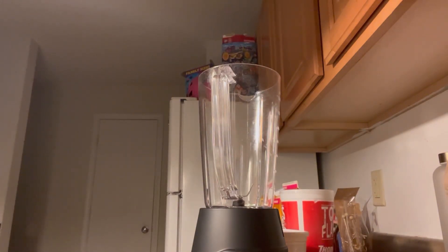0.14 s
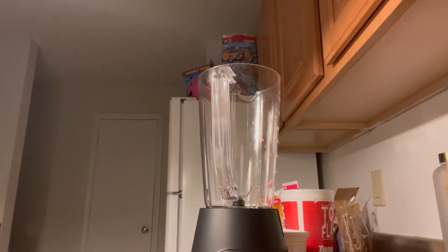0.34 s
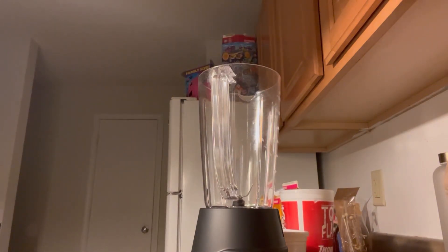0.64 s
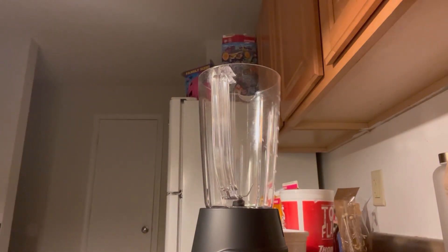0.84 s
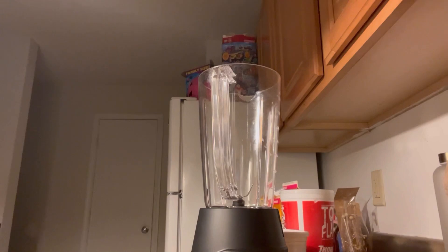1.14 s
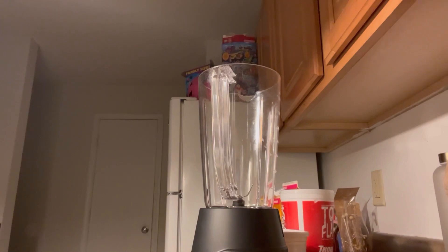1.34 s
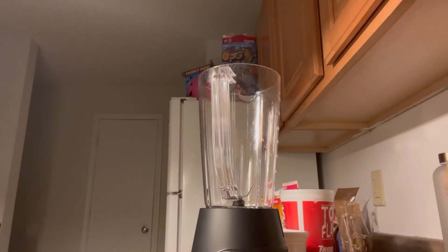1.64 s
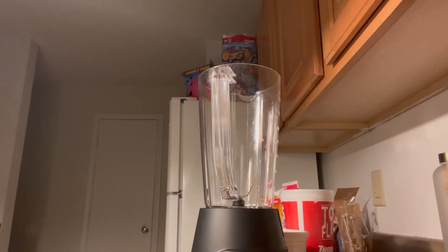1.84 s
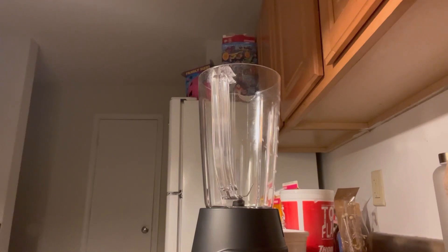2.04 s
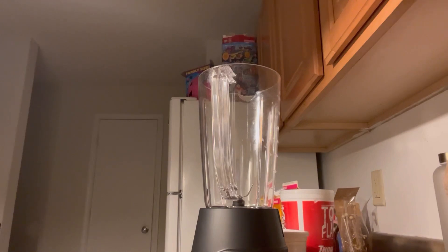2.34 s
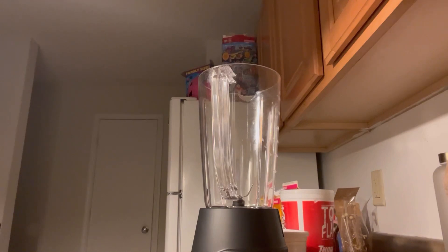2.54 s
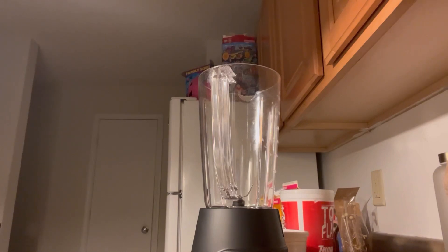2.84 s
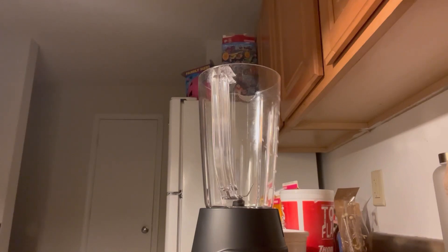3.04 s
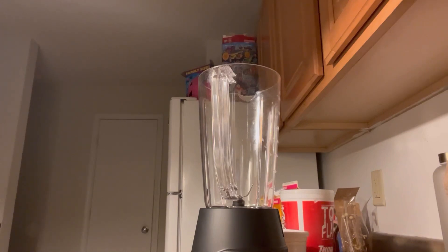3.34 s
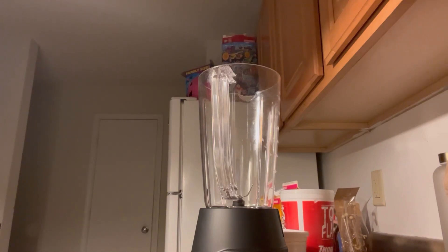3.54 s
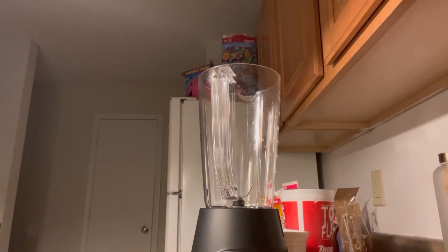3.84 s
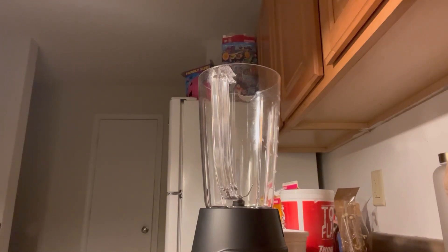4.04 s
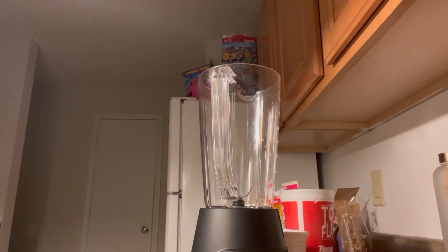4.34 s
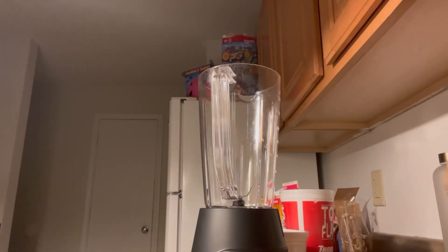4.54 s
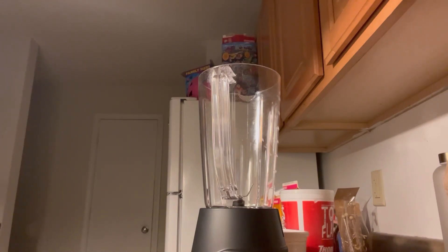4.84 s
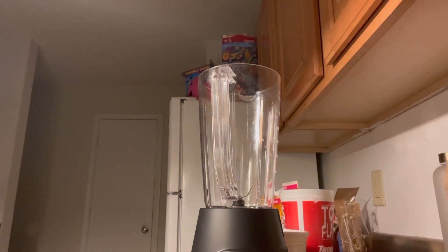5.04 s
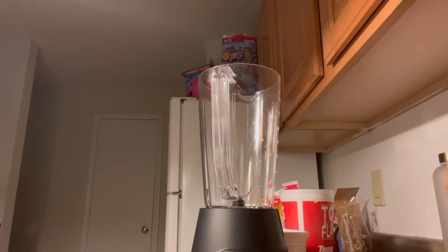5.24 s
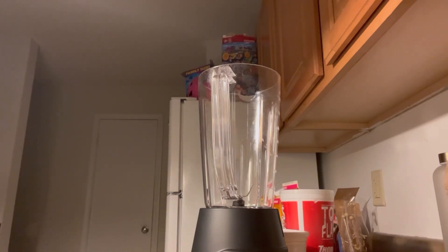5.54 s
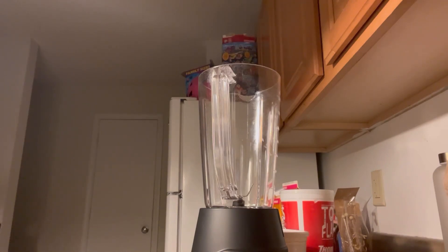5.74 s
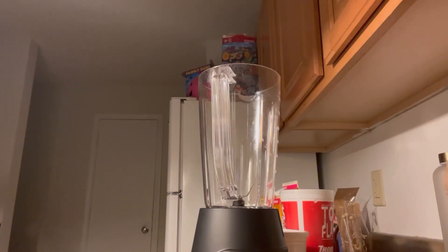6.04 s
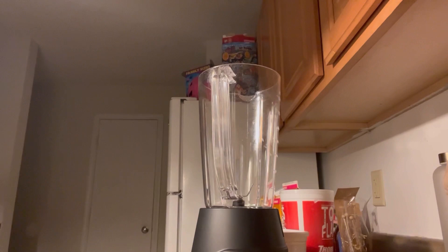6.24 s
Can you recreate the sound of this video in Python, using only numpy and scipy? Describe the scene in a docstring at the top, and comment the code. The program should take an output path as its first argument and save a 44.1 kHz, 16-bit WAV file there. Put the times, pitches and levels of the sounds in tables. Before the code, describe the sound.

In a small home kitchen, a few steps from a phone, utensils scrape, chink and clack together in a wooden drawer while dull bumps ring its panels and the wood gives a brief groan. The rummaging pauses, leaving dry wrapper ticks and one sharp crackle, then clatter resumes and the drawer bangs shut loudly with a few rattling bounces, fading into a low house hum.

```python
"""Utensils slide, chink and clatter as a hand rummages in a wooden kitchen drawer, a few steps from the phone.
They bump the drawer's walls, a wrapper ticks in a pause, and the drawer bangs shut and bounces.
Contacts are bursts of uneven force through resonances of wood, metal or wrapper; sliding is steady grit.
A short groan is a gliding tone. Room tails of decaying noise follow the contacts and the sliding.
The house hums low underneath, shaped from noise, with a faint hiss at each of the two ports."""
import sys
import numpy as np
from scipy import signal
from scipy.fft import rfft, irfft, next_fast_len
from scipy.io import wavfile
from scipy.ndimage import uniform_filter1d, map_coordinates

SR = 44100
rng = np.random.default_rng(int(sys.argv[2]) if len(sys.argv) > 2 else 0)


def master(y):
    """Save y as 16-bit WAV."""
    cut = np.clip(np.atleast_2d(y).T, -1, 1)
    pcm = np.round(cut * 32767)  # scale
    wavfile.write(sys.argv[1], SR, pcm.astype(np.int16))


N = 281530

# drawer panel resonances: [f/Hz, width/Hz, level/dB]
PANEL_MODES = [(167.8, 6.3, -14.5), (211, 34.4, -1), (278, 27, 0), (317, 22, -1), (359.7, 22, -6.5),
               (420, 41, -6.5), (476, 150, -8), (665, 88, -12.5), (754, 84, -14)]
# utensils lying damped on each other: [f/Hz, width/Hz, level/dB]
UTENSIL_MODES = [(780, 410, 9), (1290, 150, 0), (1630, 150, -3.5), (2380, 220, -23.5), (2730, 200, -8),
                 (3820, 4100, -4)]
# broad colour of utensil bodies: [f/Hz, level/dB]
DULL_COLOUR = [(60, -26), (300, 11), (600, 3.5), (1000, 2.5), (2000, 2), (3000, -4.5), (4500, -11),
               (8000, -56)]
# broad colour of bright edges: [f/Hz, level/dB]
BRIGHT_COLOUR = [(1500, -11.5), (3000, 9.5), (4500, 6), (6500, 7.5), (8000, -5), (10000, -3), (12000, -30),
                 (14200, -19.5), (14700, -59)]
# broad colour of the topmost sizzle: [f/Hz, level/dB]
SIZZLE_COLOUR = [(5000, -26.5), (8000, -6), (10800, -4), (12200, -15.5), (13700, -5.5), (14300, -25.5),
                 (14600, -59), (15500, -53.5)]


def amp(db):
    """Gain of a level in dB."""
    return 10 ** (np.asarray(db) / 20)


def unit(x):
    """x at rms 1."""
    return x / np.sqrt(np.mean(x ** 2) + 1e-20)


def along(points, hz):
    """Reads (f/Hz, value) points on a log frequency axis."""
    f, v = np.transpose(points)
    return np.interp(np.log(hz + 1), np.log(f + 1), v)


def coloured(points, f):
    """Gain at f from (f/Hz, level/dB) points."""
    return amp(along(points, f))


def curves(rows):
    """One value per sample for each column after the time."""
    s, *cols = np.transpose(rows)
    return [np.interp(np.arange(N) / SR, s, c) for c in cols]


def filtered(x, response):
    """x times a complex response of frequency."""
    m = next_fast_len(x.shape[-1] + 8192)
    spectrum = rfft(x, m) * response(np.fft.rfftfreq(m, 1 / SR))
    return irfft(spectrum, m)[..., :x.shape[-1]]


def wobble(rate):
    """A smooth random curve, rate knots a second."""
    knots = rng.standard_normal(int(N * rate / SR) + 4)
    return map_coordinates(knots, [np.arange(N) * rate / SR])


def ring(f, hz, width_hz):
    """One causal resonance, gain 1 at its top."""
    return 1j * f * width_hz / (hz * hz - f * f + 1j * f * width_hz)


def body(modes, scatter_db=0):
    """Resonances of alternating sign, their strengths scattered at random by scatter_db."""
    gains = amp(scatter_db * rng.standard_normal(len(modes)))

    def response(f):
        return sum((-1) ** k * gains[k] * amp(db) * ring(f, hz, width)
                   for k, (hz, width, db) in enumerate(modes))
    return response


def grit(size, spread_db):
    """Dense small contacts of very uneven strength."""
    return rng.standard_normal(size) * amp(spread_db * rng.standard_normal(size))


def blow(length, response, spread_db, rise, firm):
    """A firm first touch, then chatter for about `length` s; its loudest moment has rms 1."""
    t = np.arange(SR // 4) / SR
    rise = max(rise, 3e-4)
    envelope = (1 - np.exp(-t / rise)) * np.exp(-t / max(0.43 * length, 1e-3))
    force = grit(len(t), spread_db) * envelope
    force[round(rise * SR)] = firm * np.linalg.norm(force)
    sound = filtered(force, response)
    return sound / np.sqrt(uniform_filter1d(sound ** 2, size=400).max())  # 9 ms rms


def add(track, s, sound):
    """Mixes a sound in at s seconds."""
    start = round(s * SR)
    track[..., start:][..., :sound.shape[-1]] += sound[..., :N - start]


def hum():
    """The house's low wavering hum: shaped noise, near alike at both ports, with brief swells."""
    # colour of the hum: [f/Hz, level/dB]
    hum_colour = [(12, -41.5), (20, -31.5), (32, -26), (47, -4), (70, 4), (145, -17.5), (288, -35.5),
                  (420, -62), (480, -31.5), (500, -52), (650, -81), (1100, -120)]
    # slow course of the hum: [t/s, level/dB]
    hum_course = [(0, -49), (2.8, -48.5), (3.3, -54), (4.1, -52), (6.38, -48.5)]
    # brief swells on top of that course: [t/s, level/dB]
    swells = [(0.02, -45), (0.42, -51), (0.7, -57), (0.91, -50), (1.43, -44), (1.9, -50), (2.52, -59),
              (2.84, -61), (3.0, -56), (4.12, -57), (4.46, -46), (4.66, -48), (5.21, -53), (5.46, -36.5),
              (5.769, -65), (5.93, -44), (6.2, -56.5)]
    swell_s = .032  # half-width at 1/e
    noise = rng.standard_normal((3, N))
    shared, left, right = filtered(noise, lambda f: coloured(hum_colour, f))
    apart = filtered(np.array([left, right]), lambda f: 0.068 + 0.59 * ring(f, 130, 410))
    t = np.arange(N) / SR
    level = amp(curves(hum_course)[0])
    level = level + sum(amp(db) * np.exp(-((t - s) / swell_s) ** 2) for s, db in swells)
    return level * unit(shared + apart) * amp([[-.7], [.7]])  # right slightly louder


def hiss():
    """Faint steady noise, unrelated at the two ports."""
    # colour of the hiss: [f/Hz, level/dB]
    hiss_colour = [(180, -55.5), (300, 6.5), (417, -4), (1140, -13), (2680, -18.5), (3910, -17),
                   (5900, -20), (9840, -24.5), (10900, -19.5), (15300, -48.5)]
    noise = rng.standard_normal((2, N))
    return amp(-79) * unit(filtered(noise, lambda f: coloured(hiss_colour, f)))


def strokes():
    """Gains of rumble, scrape, rustle and sizzle: each stroke swells, holds and lets go."""
    # pushes along the drawer: [t/s, length/s, utensil scrape level/dB, drawer rumble level/dB, rustle level/dB]
    stroke_table = [(0.0, 0.51, -62, -54, -67.5), (0.288, 0.37, -62.5, -54.5, -71),
                    (0.672, 0.13, -67.5, -57.5, -77), (0.862, 0.23, -62.5, -73, -62),
                    (1.378, 0.19, -54.5, -52, -64), (1.63, 0.33, -61, -56, -67),
                    (1.961, 0.19, -65, -58, -70), (2.214, 0.2, -62, -57, -69),
                    (2.457, 0.25, -61, -53.5, -61), (2.846, 0.071, -63, -61.5, -67.5),
                    (3.884, 0.071, -59, -51.5, -73), (4.052, 0.31, -65.5, -55.5, -68),
                    (4.333, 0.39, -64.5, -57.5, -69), (5.117, 0.011, -54.5, -67.5, -55),
                    (5.25, 0.15, -47, -40, -69.5), (5.452, 0.095, -59.5, -44, -62),
                    (5.586, 0.15, -67, -58, -82), (5.788, 0.4, -71.5, -66.5, -75),
                    (6.112, 0.25, -67, -65, -86)]
    # levels between strokes, one each: [rumble/dB, scrape/dB, rustle/dB, sizzle/dB]
    resting_db = [-84.5, -91.5, -105, -100.5]
    attack_s, release_s = .06, 0.052  # outside the stroke's own length
    sizzle_under_rustle_db = 13.5
    t = np.arange(N) / SR
    power = amp(np.array(resting_db)[:, None] + 0 * t) ** 2
    for s, length, scrape_db, rumble_db, rustle_db in stroke_table:
        swell = (t - s) / attack_s + 1
        let_go = (s + length - t) / release_s + 1
        shape = np.clip(np.minimum(swell, let_go), 0, 1) ** 2
        levels_db = [[rumble_db], [scrape_db], [rustle_db], [rustle_db - sizzle_under_rustle_db]]
        power = power + (amp(levels_db) * shape) ** 2
    return np.sqrt(power)


def jostles():
    """Scattered little knocks, each on its own short-lived pitch; higher ones tend to be weaker."""
    per_s, centre_hz, span_db, decay_cycles = 160, 1398, 14, 2.5
    count = round(per_s * N / SR)
    when, pitch, size = rng.random(count), rng.standard_normal(count), rng.random(count)
    hz = np.clip(centre_hz * np.exp(.5 * pitch), 400, 4000)[:, None]
    t = np.arange(SR // 40) / SR
    strength = amp(span_db * size ** 2)[:, None] * np.sqrt(centre_hz / hz)
    envelope = np.exp(-t * hz / decay_cycles) * (1 - np.exp(-t / 0.0011))
    knocks = strength * np.sin(2 * np.pi * hz * t) * envelope
    at = (when * N).astype(int)[:, None] + np.arange(len(t))
    return unit(np.bincount(at.ravel(), knocks.ravel(), minlength=N)[:N])


def sliding():
    """Stick-slip grit drives panels, utensils and loose thin things."""
    wood, tools = body(PANEL_MODES), body(UTENSIL_MODES)
    colours = [lambda f: wood(f) / (1 + 1j * f / 600) ** 2,
               lambda f: coloured(DULL_COLOUR, f) * (6.9 + 0.11 * tools(f)),
               lambda f: coloured(BRIGHT_COLOUR, f),
               lambda f: coloured(SIZZLE_COLOUR, f)]
    clumps_db = 4 * wobble(45)  # slips come in bunches, felt by every layer at once
    caught = rng.random(N) < 70 / SR  # about 70 a second
    snags = 12 * caught * rng.standard_normal(N)  # lone catches stand out as tiny knocks
    gains = strokes()
    out = amp(-3.5) * gains[1] * jostles()  # small touches follow the scrape
    for gain, colour in zip(gains, colours):
        force = unit(grit(N, spread_db=7.0)) + snags
        unevenness = amp(clumps_db + 0.36 * wobble(30))
        out += gain * unevenness * unit(filtered(force, colour))
    return out


def clacks():
    """Utensil contacts ring damped metal under a bright chatter; rows: direct, sent to the room."""
    # utensil contacts: [t/s, level/dB, treble level/dB, sizzle level/dB, strongest ring f/Hz, ring level/dB,
    # ring width over pitch (held to 0.02-1), rattle length/s, room share level/dB]
    clack_table = [(0.005, -44, -26, -37, 626, 19, 0.18, 0.045, -6.5),
                   (0.063, -61.5, -5.5, -31, 1230, -8, .1, 0.19, 9.5),
                   (0.163, -43.5, -9, -11, 1340, -15, 0.11, 0.049, 1.5),
                   (0.233, -45, -25, -30, 1000, 20, 0.16, 0.013, -9),
                   (0.27, -49, -9, -27, 397, 15, .1, 0.044, 0),
                   (0.301, -46, -7.5, -19, 890, 5, 0.12, 0.021, 5),
                   (0.378, -46, -24, -40, 1650, 2, 0.032, 0.039, 7),
                   (0.428, -32, -26, -21.5, 1000, 17, 0.4, 0.016, -2),
                   (0.431, -40.5, -17, -25, 2280, 10, 0.26, 0.013, -2),
                   (0.435, -39, -30, -30, 1656, 26, 0.044, 0.062, -15),
                   (0.454, -37, -30, -21, 1000, 10, 0.17, 0.015, -15),
                   (0.522, -49, -16, -9, 880, 12, .1, 0.015, 4.5),
                   (0.551, -44, -9.5, -12.5, 2280, -3, 0.15, 0.027, -3.5),
                   (0.767, -61, -3, -6, 3120, 2, .1, 0.046, 3),
                   (0.841, -46.5, -9.5, -42, 1220, 5, 0.14, 0.029, 2.5),
                   (0.912, -48, -10, -9, 940, 1, 0.15, 0.0084, 2),
                   (1.058, -50.5, -30, -20, 890, 6, 0.29, 0.097, 2),
                   (1.059, -49, -18, -25, 2500, 18, .3, 0.013, 1.5),
                   (1.282, -58, -28, -22, 940, 20, 0.2, 0.02, 2),
                   (1.288, -59, -25, -25, 600, 15, .12, 0.033, 5),
                   (1.324, -55.5, -5, -9, 1340, -4, .1, 0.046, 2.5),
                   (1.345, -43.5, -11.5, -16, 880, -1, 0.15, 0.08, 2.5),
                   (1.395, -42, -11.5, -14, 900, -1, .3, 0.027, 0),
                   (1.421, -43, -17, -20, 634, 8, .1, .06, -4),
                   (1.51, -35, -14.5, -35, 1120, 2, 0.059, 0.026, 0.5),
                   (1.542, -44, -13, -2.5, 2310, 43, 0.081, 0.029, -0.5),
                   (1.764, -44.5, -21, -37, 950, 8, 0.081, 0.028, -3),
                   (1.847, -55, -17, -1.5, 2210, -17, .1, 0.049, 3.5),
                   (1.866, -37.5, -8, -8.5, 965, 14, 0.28, 0.036, 1.5),
                   (1.893, -32.5, -25, -14, 2260, 13, 0.16, 0.013, -2),
                   (1.897, -32, -23, -20.5, 1020, 5, 0.35, 0.027, -2.5),
                   (1.908, -36, -15, -22, 1650, 3, 0.37, 0.028, 2),
                   (1.924, -44, -13, -2.5, 1330, 24, .1, 0.055, -3),
                   (1.982, -41, -14, -10, 1600, -1, .1, 0.017, 2.5),
                   (2.165, -44.5, -16, -35, 960, 20, .2, 0.011, -1),
                   (2.175, -52.5, -12, -35, 2300, -5, .3, .06, -1),
                   (2.239, -37.5, -31, -43, 920, 20, 0.2, 0.0093, -4),
                   (2.2395, -47, -20, -40, 2220, 22, .2, 0.0074, -4),
                   (2.253, -45.5, -17.5, -43, 1210, 1, .2, 0.03, -9),
                   (2.264, -43, -23, -43, 920, 22, .15, .009, -7),
                   (2.284, -49, -25, -40, 1250, 12, .2, .012, -5),
                   (2.32, -52, -18, -32, 3020, 7, 0.28, 0.033, 5.5),
                   (2.325, -52, -25, -35, 950, 20, .15, .01, -5),
                   (2.343, -45, -27, -35, 1050, 14, 0.39, 0.0089, -3),
                   (2.359, -40, -27, -31, 1000, 17, 0.27, 0.0072, -6),
                   (2.368, -44.5, -21, -31, 1050, 18, 0.45, 0.016, -6),
                   (2.486, -61, -30, -17, 930, 7, 0.22, 0.037, -2),
                   (2.521, -45.5, -34, -19, 920, 1, 0.22, 0.18, 1),
                   (2.739, -55, -7, -4.5, 2340, 5, 0.13, 0.044, 0.5),
                   (2.827, -49.5, -6, -11, 1080, 9, 0.16, 0.077, 1.5),
                   (2.839, -47, -9, -18, 3070, 27, 0.13, 0.028, 4.5),
                   (2.898, -47.5, -7, -14, 950, 6, .1, 0.005, -9),
                   (3.853, -41.5, -30, -35, 2300, -9, 0.18, 0.02, 3),
                   (4.05, -43.5, -37, -56, 930, -18, 0.089, 0.19, 0.5),
                   (4.117, -34, -3, -13, 1640, 2, 0.099, 0.0059, 5),
                   (4.134, -34, -20, -20, 2270, 6, 0.078, 0.019, -9.5),
                   (4.189, -36, -12.5, -18, 1650, -5, 0.14, 0.014, 3),
                   (4.371, -28.5, -15.5, -23, 1040, 36, 0.051, 0.014, -4.5),
                   (4.383, -39.5, -13, -22, 830, 16, 0.17, 0.013, 1),
                   (4.409, -40.5, -11, -16, 900, 11, .3, 0.015, -1.5),
                   (4.54, -53.5, -7, -21, 770, 23, 0.089, 0.032, 0.5),
                   (4.626, -34, -11.5, -46, 893, 18.5, 0.06, 0.032, -4),
                   (4.643, -37, -25, -38, 2150, -1, 0.35, 0.032, 2.5),
                   (4.804, -51.5, -23, -41, 780, 15, 0.12, 0.046, 0),
                   (5.098, -51, -6, -25, 2700, 10.5, .15, .02, 7),
                   (5.113, -32.5, -17.5, -18, 770, 21, 0.043, 0.022, -1),
                   (5.168, -40.5, -29, -46, 2160, -5, 0.13, 0.036, 10),
                   (5.183, -19, -23, -43.5, 780, 21, 0.27, 0.018, 5.5),
                   (5.189, -20, -31, -30, 1670, 17, 0.18, 0.018, 5),
                   (5.199, -14.5, -14, -35, 2360, 26.5, 0.17, 0.01, -7.5),
                   (5.205, -15.5, -16, -27.5, 3200, 20, 0.43, 0.012, -6),
                   (5.222, -18.5, -35, -40, 1220, 3, 0.14, 0.03, -3),
                   (5.255, -31.5, -24.5, -40, 760, 13.5, .15, 0.022, -4.5),
                   (5.3, -31, -25, -40, 656, 11.5, .15, .02, -1),
                   (5.36, -34, -28, -54, 770, 16, 0.11, 0.017, 6),
                   (5.436, -27.5, -16, -19, 2850, 3, 0.14, 0.013, -3.5),
                   (5.444, -27, -25, -31, 780, 5, 0.16, 0.032, -1),
                   (5.501, -40.5, -9.5, -9.5, 649, 19, .15, 0.018, -3.5),
                   (5.891, -73, 8.5, -25.5, 605, -2, 0.094, 0.021, 4.5),
                   (5.942, -61, 7, -13, 2660, -7, .1, 0.036, 1.5),
                   (5.957, -67, -5, -29, 2000, 1, .3, 0.036, -0.5),
                   (6.329, -59.5, -7.5, -21, 2300, 2, .2, 0.016, -1.5)]
    crest_db = 4  # peak over loudest rms
    firm_s = .008  # a shorter rattle gets the full first touch
    out = np.zeros((2, N))
    for s, db, treble_db, sizzle_db, hz, ring_db, width, length, room_db in clack_table:
        tools = body(UTENSIL_MODES, scatter_db=3)
        width_hz = np.clip(width, .02, 1) * hz

        def metal(f):
            rings = 0.7 + 0.086 * tools(f) + amp(ring_db) * ring(f, hz, width_hz)
            return coloured(DULL_COLOUR, f) * rings

        def edge(f):
            treble = amp(along(BRIGHT_COLOUR, f) + treble_db)
            return treble + amp(along(SIZZLE_COLOUR, f) + sizzle_db)
        firm = min(1, firm_s / max(length, 1e-3))
        clack = blow(length, metal, spread_db=5.0, rise=.0015, firm=firm)
        chatter = blow(length, edge, spread_db=9.0, rise=0.0036, firm=0.077)  # builds a little later
        sound = amp(db - crest_db) * clack + amp(db + max(treble_db, sizzle_db)) * chatter
        add(out, s, sound * amp([[0], [room_db]]))
    return out


def bumps():
    """Blunt knocks ring the drawer panels and boom the cabinet; rows: direct, sent to the room."""
    # bumps on the wood: [t/s, level/dB, boom level/dB, boom f/Hz,
    # upper panels level/dB before a common lift, strongest ring f/Hz, rattle length/s]
    bump_table = [(0.009, -37, -13, 112, -6, 250, 0.015), (0.049, -40.5, -1.5, 113, -23, 244, 0.029),
                  (0.18, -39.5, -23, 113, -33, 212, 0.043), (0.285, -33.5, -15, 114, -33, 212, 0.016),
                  (0.356, -33, -10, 111.5, -18, 290, 0.093), (0.428, -35.5, 2.5, 112, 17, 158, 0.0074),
                  (0.879, -35.5, -13, 113, -29, 218, 0.1), (1.058, -37.5, -2.5, 112, -25, 257, 0.18),
                  (1.396, -21, -11, 113.5, -28, 283, 0.0078), (1.413, -29.5, -5, 113, -18, 227, 0.022),
                  (1.44, -32, -5, 113, -20, 300, 0.048), (1.541, -51, 13, 110, -28, 288, 0.021),
                  (1.893, -32.5, -9, 99, -12, 308, 0.16), (2.195, -45, -1, 119, -16, 298, 0.072),
                  (2.49, -32, -5.5, 111, -5, 228, 0.18), (2.545, -28.5, -18, 113, 6, 427, 0.083),
                  (2.625, -33.5, -12, 113, -22, 293, 0.069), (2.673, -32.5, -22, 114, -38, 280, 0.02),
                  (2.706, -52, -16, 113, -24, 279, 0.023), (2.83, -55, -7, 160, -22, 254, 0.02),
                  (3.851, -39.5, -4, 104, -7, 243, 0.23), (4.213, -36, -3, 106, -27, 204, 0.037),
                  (4.371, -37, -11.5, 110, -25, 305, .05), (4.412, -32, -11.5, 101, -21, 263, 0.0094),
                  (4.447, -37, -19, 105, -19, 275, 0.02), (4.634, -31, -9, 113, -12.5, 229, 0.032),
                  (4.652, -35, -0.5, 138, -14, 202, .03), (5.118, -36.5, -6, 112, -10, 282, 0.036),
                  (5.184, -11, -12.5, 152, -12.5, 240, 0.013), (5.19, -14.5, -6.5, 124, -28.5, 280, 0.042),
                  (5.205, -15, -6, 124, -13, 297, 0.025), (5.227, -15.5, -14.5, 146, -5.5, 302, 0.01),
                  (5.281, -28, -12.5, 140, -8, 275, 0.034), (5.352, -23, -18, 113, -7, 275, 0.024),
                  (5.441, -17.5, -1.5, 110, -1.5, 268, 0.016), (5.466, -19, -6, 137, -16, 227, 0.0096),
                  (5.497, -25.5, -0.5, 103, -7, 164, 0.071), (5.547, -36.5, -3.5, 99, 1.5, 225, .03),
                  (6.178, -44.5, -6, 113, -29, 245, 0.15)]
    crest_db, room_db = 4, -2.5  # peak over loudest rms; the room takes less of a bump
    out = np.zeros((2, N))
    for s, db, deep_db, deep_hz, upper_db, hz, length in bump_table:
        wood = body(PANEL_MODES, scatter_db=3)

        def soft(f):
            blunt = 1 / (1 + 1j * f / 450) ** 2  # a blunt contact carries little treble
            upper = amp(upper_db + 7.5) * ring(f, 470, 540)
            return (wood(f) + 2.9 * ring(f, hz, 36.0)) * (blunt + upper)

        def boom(f):
            return ring(f, deep_hz, 36) ** 2
        panels = blow(length, soft, spread_db=-2.0, rise=0.002805, firm=0.65)
        cabinet = blow(length, boom, spread_db=-2.5, rise=0.0055, firm=0.62)
        sound = amp(db - crest_db) * (panels + amp(deep_db) * cabinet)
        add(out, s, sound * amp([[0], [room_db]]))
    return out


def chinks():
    """A steel spoon touches another: free steel rings on a few clean modes."""
    # spoon touches: [t/s, level/dB]
    chink_table = [(0.7701, -74), (0.8899, -72)]
    # steel modes: [f/Hz, level/dB before random scatter, t60/s]
    steel_modes = [(3770, 1, 0.11), (5200, 12, 0.1), (7300, -11, .08)]
    out, t = np.zeros(N), np.arange(SR // 4) / SR
    for s, db in chink_table:
        for hz, level_db, t60 in steel_modes:
            decay = amp(level_db + 2.8 * rng.standard_normal() - 60 * t / t60)
            add(out, s, amp(db) * decay * np.sin(2 * np.pi * hz * t))
    return out


def groan():
    """The drawer front groans on its runner: regular stick-slip sings as one gliding pitch."""
    # course of the groan: [t/s, f/Hz, level/dB before a small wobble]
    groan_course = [(2.489, 434.4, -17), (2.51, 428.4, -62), (2.535, 431, -29), (2.557, 438, -23.5),
                    (2.575, 421, -43), (2.61, 419, -38), (2.64, 400, -66)]
    hz, db = curves(groan_course)
    t = np.arange(N) / SR
    to_ends = np.minimum(t - groan_course[0][0], groan_course[-1][0] - t)
    moving = np.clip(to_ends / 0.014, 0, 1)
    tone = np.sin(2 * np.pi * np.cumsum(hz) / SR)
    return np.sqrt(2) * amp(db + 0.64 * wobble(44.0)) * moving * tone


def ticks():
    """Thin dry ticks of a wrapper, whose light skin rings only high up."""
    # wrapper ticks: [t/s, level/dB, sizzle level/dB before a common lift, rattle length/s]
    tick_table = [(3.101, -67, -8, 0.013), (3.173, -68, -15, .009), (3.208, -58.5, -5, 0.0054),
                  (3.364, -56, -11, 0.012), (3.414, -59, -6, 0.025), (3.686, -55.5, -14, 0.01),
                  (3.789, -55, -32, 0.01), (3.8028, -28.5, 0, 0.008)]
    # wrapper resonances: [f/Hz, width/Hz, level/dB]
    skin_modes = [(2300, 390, -10), (3320, 220, -9), (4650, 660, -9), (5650, 390, 5), (6270, 640, 1),
                  (7940, 170, 5), (9100, 300, 1), (9900, 300, 0.5), (10740, 530, 3.5), (11800, 280, 4),
                  (13200, 600, 3.5)]
    crest_db = 5.5  # peak over loudest rms
    out = np.zeros(N)
    for s, db, sizzle_db, length in tick_table:
        modes = body(skin_modes, scatter_db=1.5)

        def skin(f):
            sizzle = amp(along(SIZZLE_COLOUR, f) + sizzle_db + 8.0)
            return (modes(f) + 0.3) * (coloured(BRIGHT_COLOUR, f) + sizzle)
        add(out, s, amp(db - crest_db) * blow(length, skin, spread_db=8, rise=0.0043, firm=1.0))
    return out


def kitchen(x):
    """Two unrelated room tails of decaying noise, drawn anew every quarter second and crossfaded."""
    # decay of the kitchen: [f/Hz, t60/s]
    room_decay = [(100, 0.71), (300, 0.51), (1000, 0.51), (4000, 0.54), (12000, 0.35)]
    # colour of the room sound: [f/Hz, level/dB]
    echo_colour = [(100, -5), (300, -1.5), (1000, -1), (2500, -3), (6000, -0.5), (12000, -0.5)]
    step, delay = SR // 4, 130  # samples
    out = np.zeros((2, N + 3 * SR))
    padded, fade = np.pad(x, step), np.hanning(2 * step)
    for start in range(0, N + step, step):
        hz, t, z = signal.stft(rng.standard_normal((2, SR * 3 // 4)), SR, nperseg=512)
        t60 = along(room_decay, hz)[:, None]
        nook = 1.11 * amp(-60 * t / (0.25 * t60))  # the counter nook dies four times as fast
        tail = signal.istft(z * (amp(-60 * t / t60) + nook), SR, nperseg=512)[1]
        piece = padded[start:start + 2 * step] * fade[:len(padded) - start]
        wet = signal.fftconvolve(piece[None], tail / np.linalg.norm(tail[0]), axes=1)
        out[:, start + delay:][:, :wet.shape[1]] += wet
    return filtered(out[:, step:step + N], lambda f: coloured(echo_colour, f))


def ports(pair):
    """Two close microphone ports hear a shared and an unshared part, with a lead and lean by pitch."""
    # likeness of the ports: [f/Hz, likeness 0-1]
    likeness = [(60, 0.75), (250, 0.84), (500, 0.69), (1000, 0.026), (2000, 0.096), (4000, 0.02),
                (8000, 0.17), (12000, 0.33)]
    # lead of the left port: [f/Hz, phase/rad]
    left_lead = [(0, -0.5), (430, 3), (650, 3), (900, 1.83), (1210, 1.8), (1980, 2), (2410, 0.92),
                 (3620, 2), (5940, 9.5), (7750, 7), (8700, 11), (10400, 10.5), (13000, 15), (14000, 14),
                 (15100, 17)]
    # left minus right: [f/Hz, level/dB]
    left_lean = [(60, 3.5), (110, -0.5), (200, 9.5), (380, 0), (700, 8.5), (1280, 2.5), (2370, 9),
                 (4370, 0.5), (8070, 3), (14900, 5)]

    def split(f):
        turn = np.arccos(np.clip(along(likeness, f), -1, 1)) / 2
        return np.array([np.cos(turn), np.sin(turn)])

    def offset(f):
        hz, lead = np.transpose(left_lead)
        half = amp(along(left_lean, f) / 2) * np.exp(.5j * np.interp(f, hz, lead))
        return np.array([half, 1 / half])
    shared, apart = filtered(pair, split)
    return filtered(np.array([shared + apart, shared - apart]), offset)


def scene():
    """The drawer in the kitchen over the house."""
    direct, sent = clacks() + bumps() + ticks() + chinks() + sliding()
    silent = np.zeros(N)
    through_counter = np.array([groan(), silent])  # the groan arrives by the counter, without a room tail
    drawer = ports(kitchen(sent) + [direct, silent] + through_counter)
    pan_db = -4  # left minus right, on top of the ports' lean
    return drawer * amp([[pan_db / 2], [-pan_db / 2]]) + hum() + hiss()


def record(dry):
    """The phone keeps nothing above its band limit."""
    top_hz = 15500
    return filtered(dry, lambda f: f < top_hz)


dry = scene()
out = record(dry)
master(out)
```